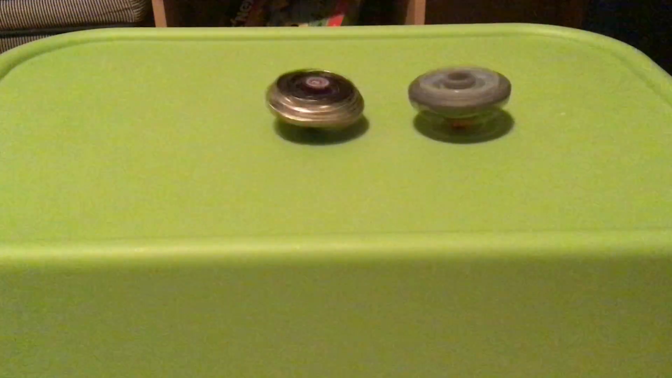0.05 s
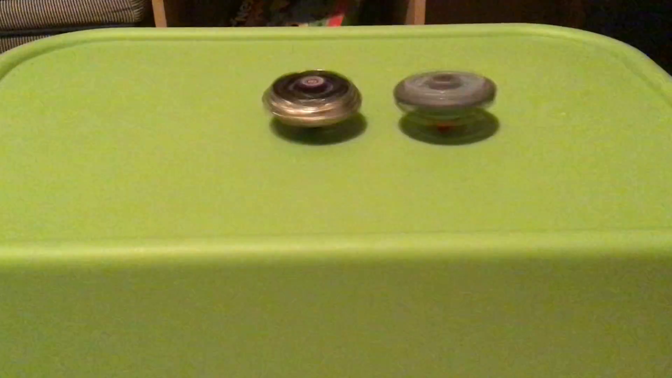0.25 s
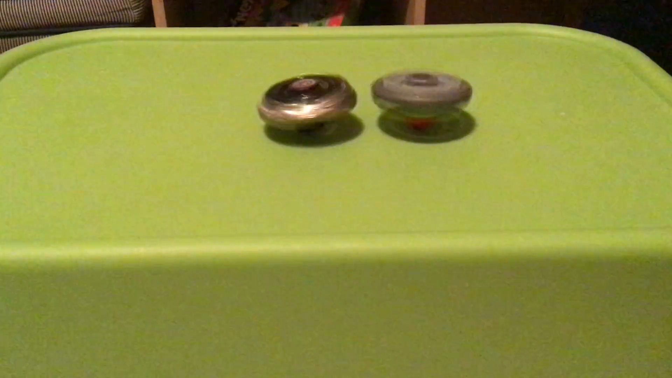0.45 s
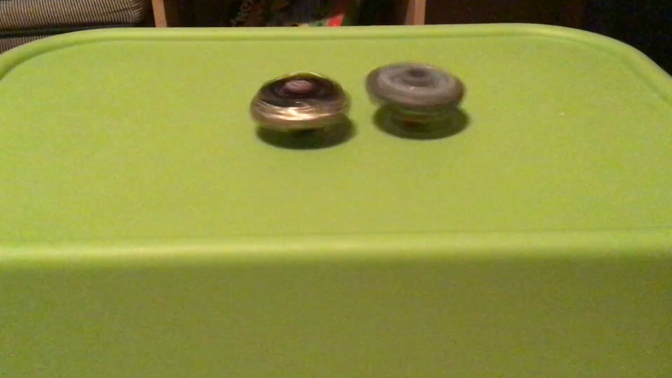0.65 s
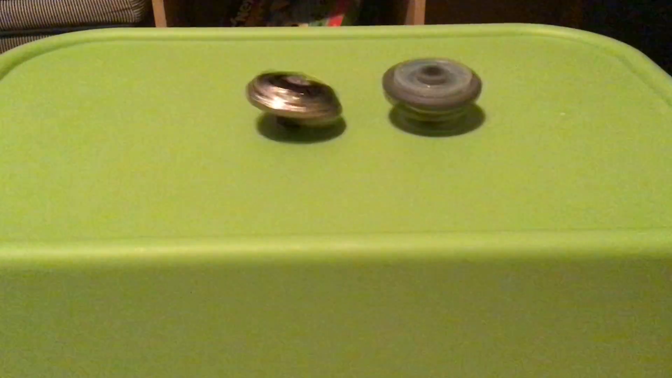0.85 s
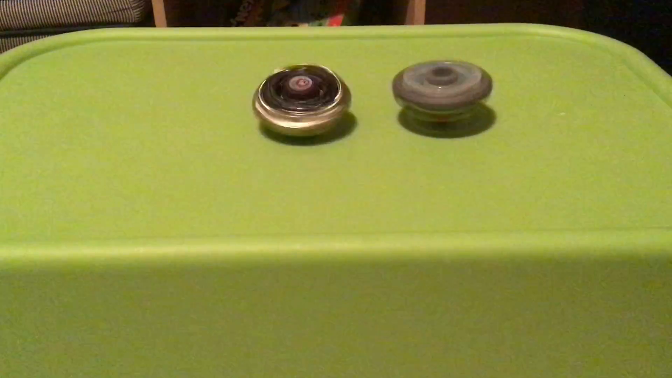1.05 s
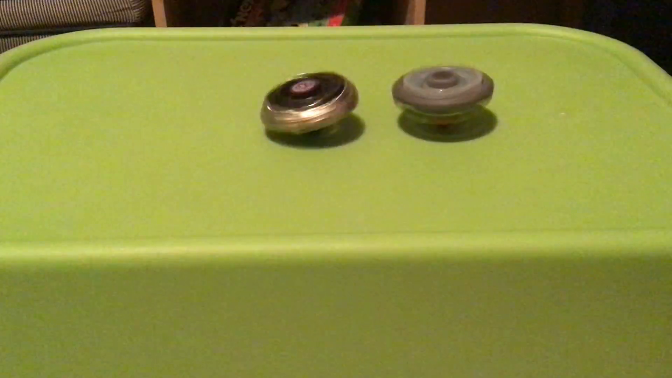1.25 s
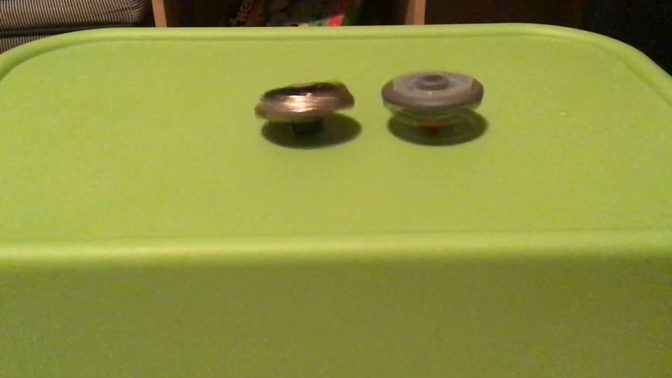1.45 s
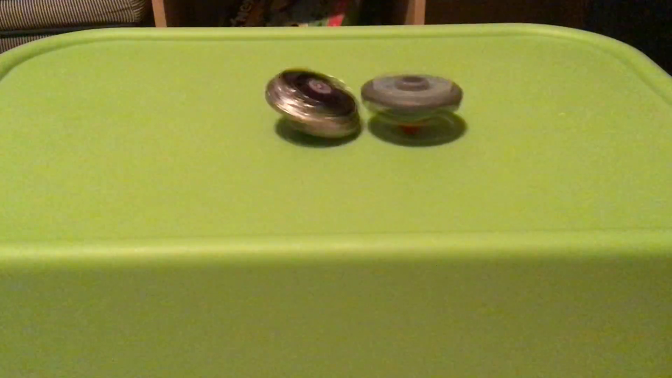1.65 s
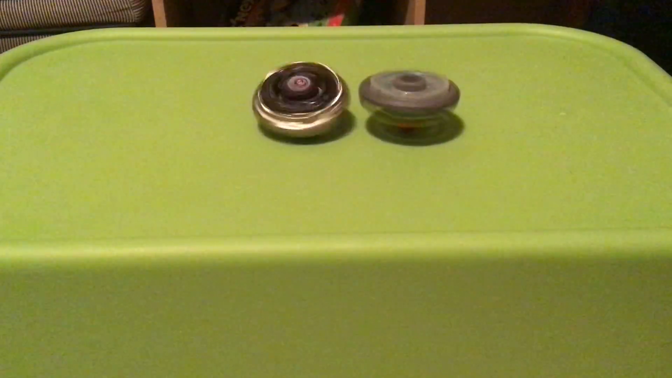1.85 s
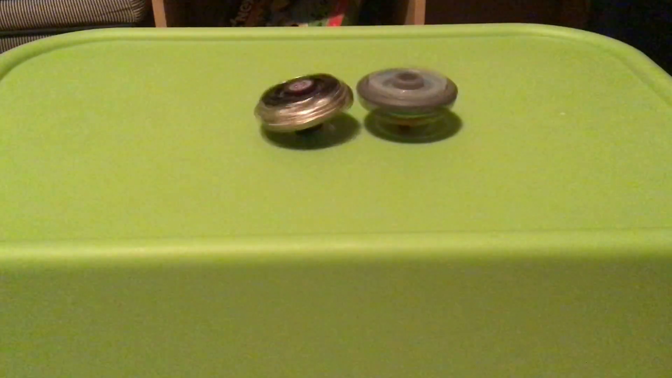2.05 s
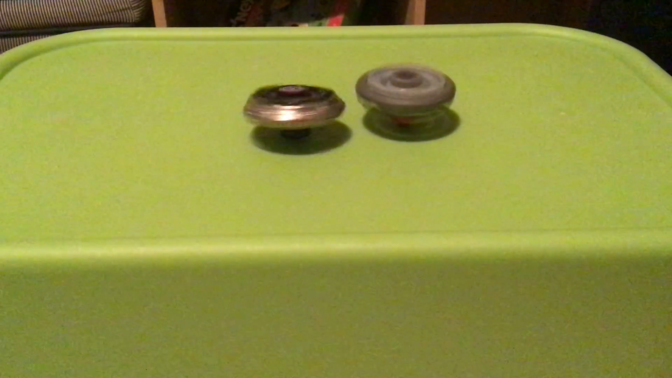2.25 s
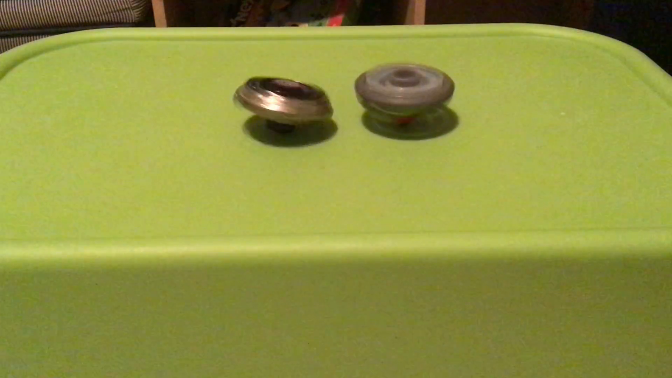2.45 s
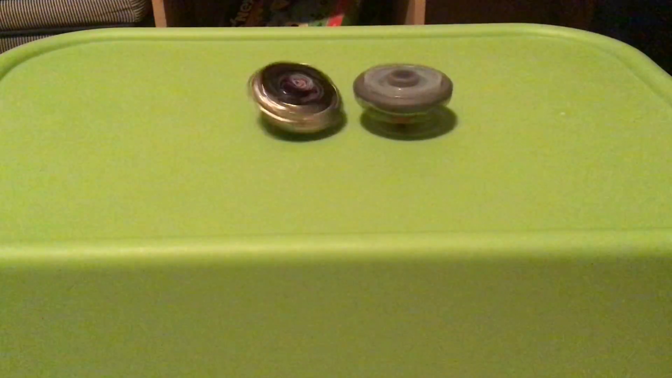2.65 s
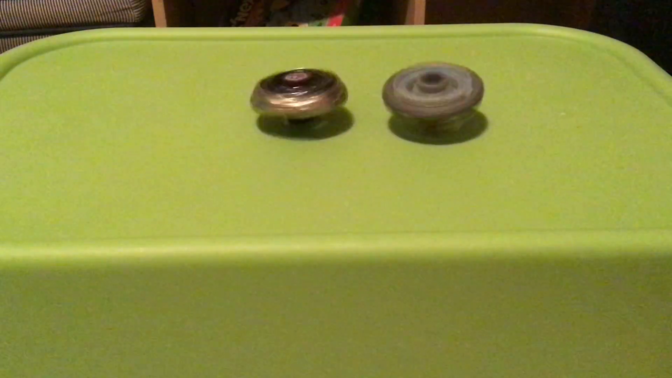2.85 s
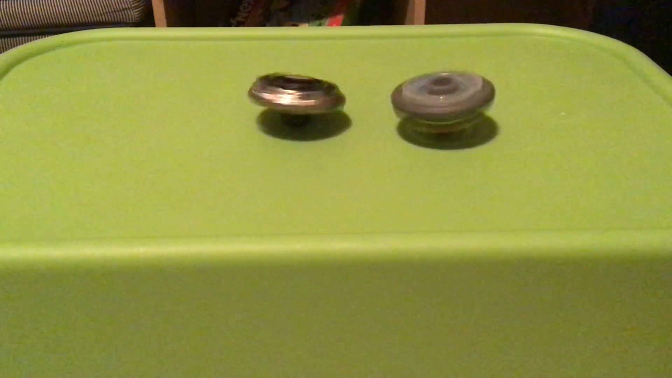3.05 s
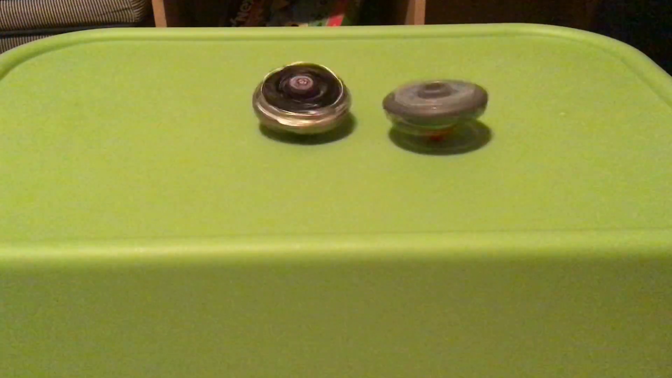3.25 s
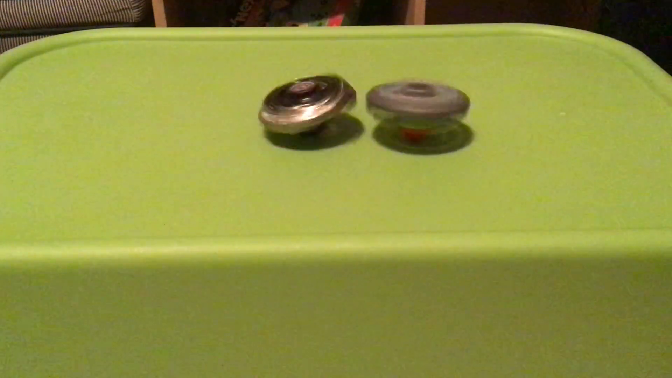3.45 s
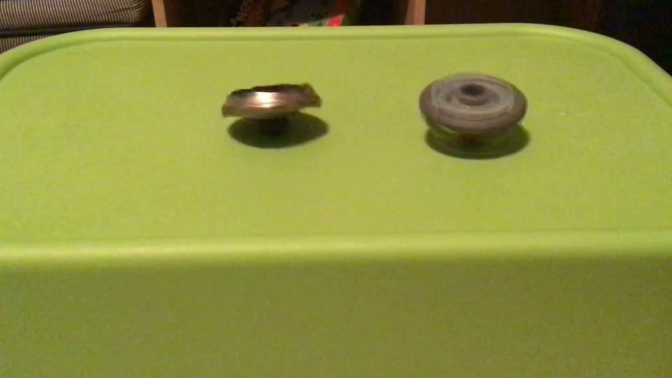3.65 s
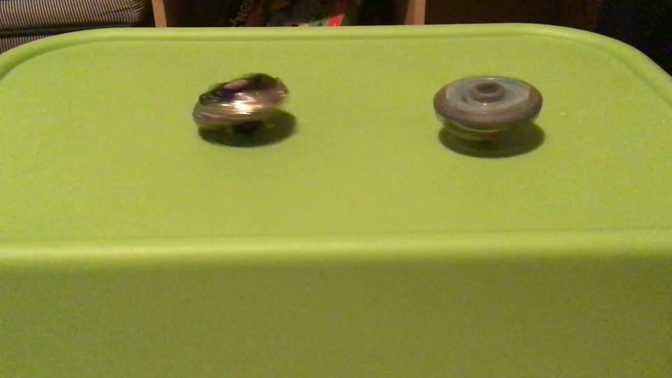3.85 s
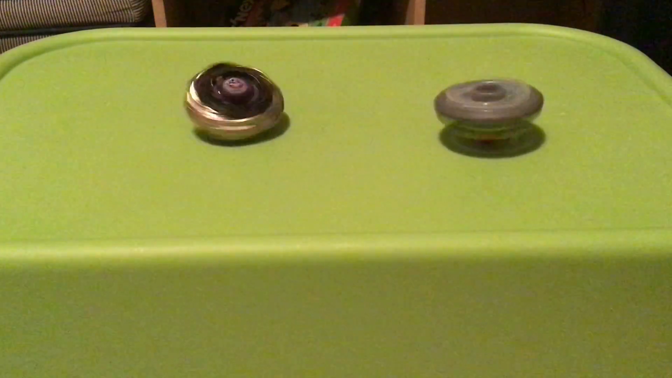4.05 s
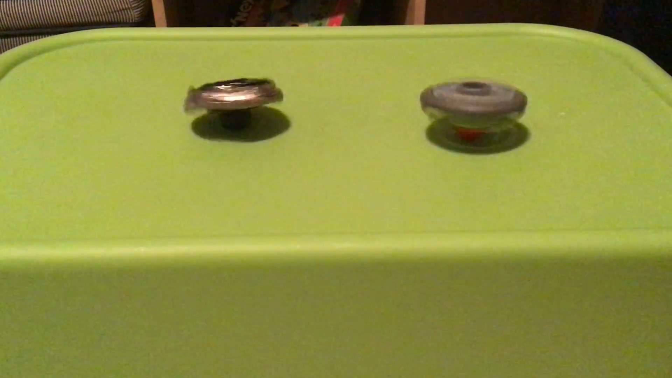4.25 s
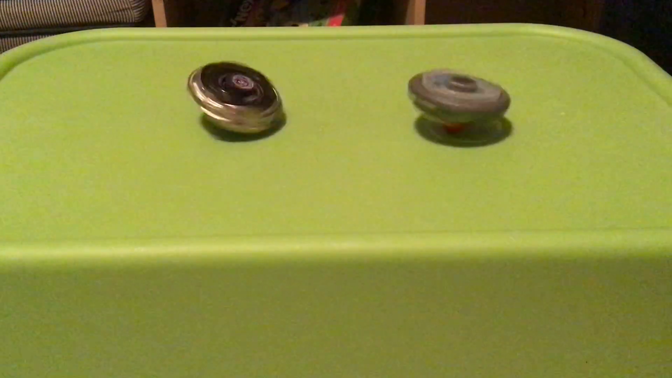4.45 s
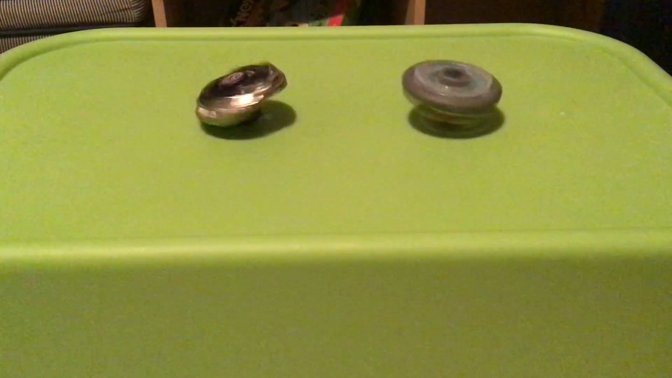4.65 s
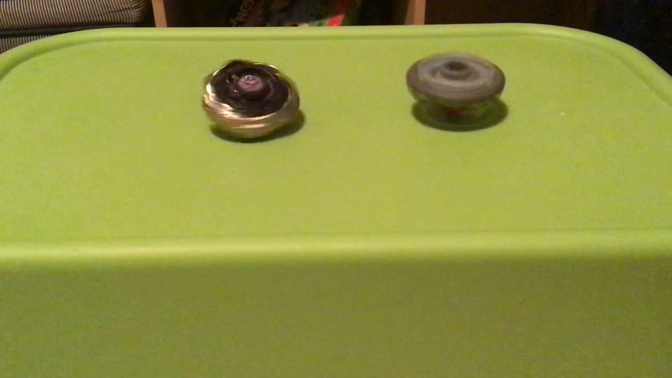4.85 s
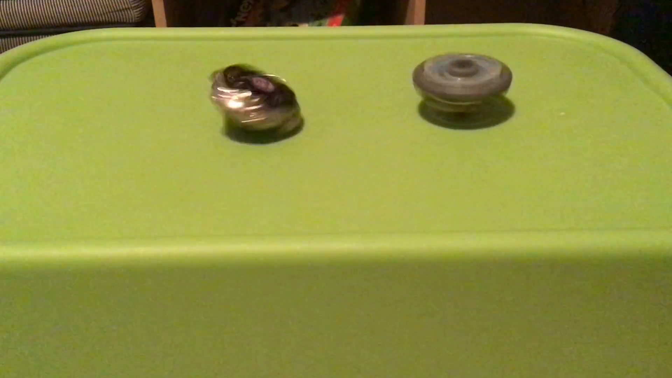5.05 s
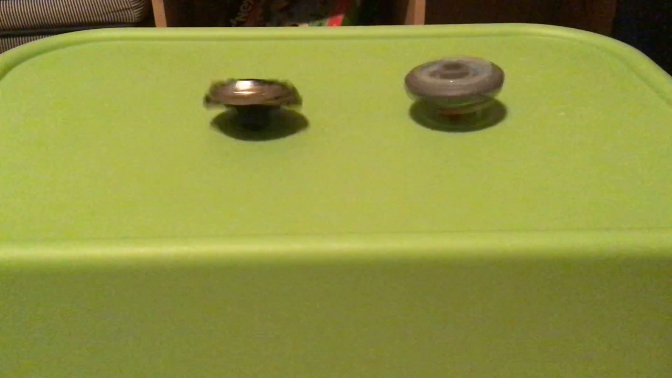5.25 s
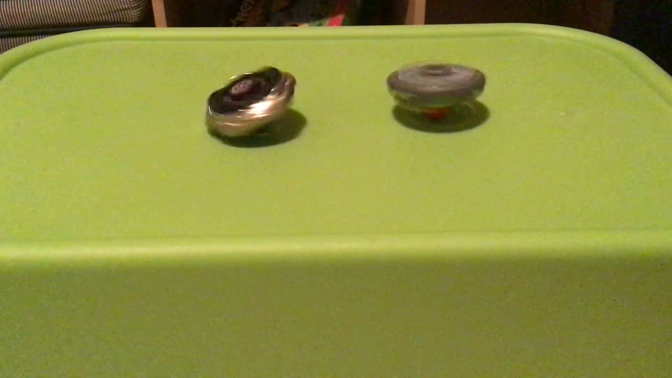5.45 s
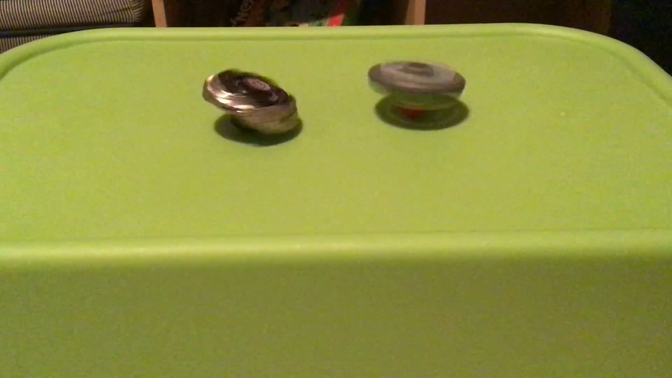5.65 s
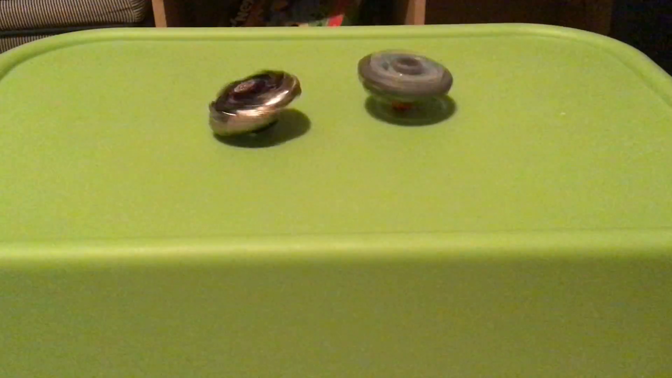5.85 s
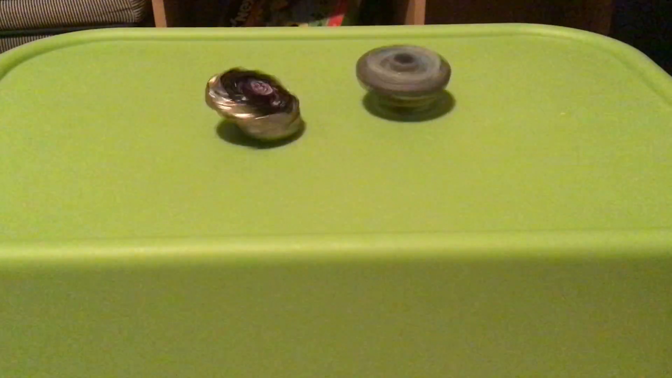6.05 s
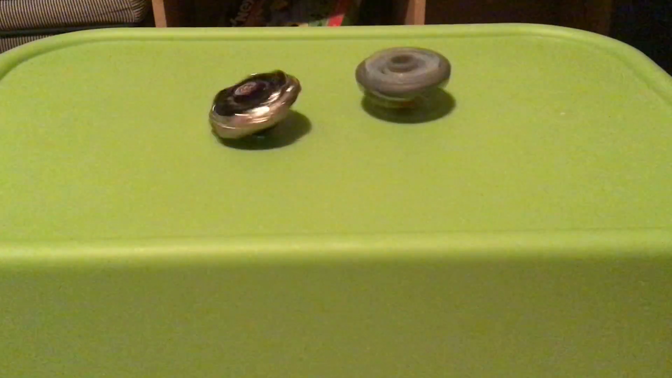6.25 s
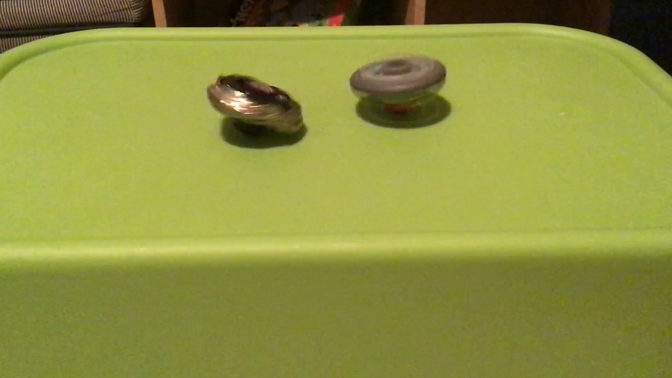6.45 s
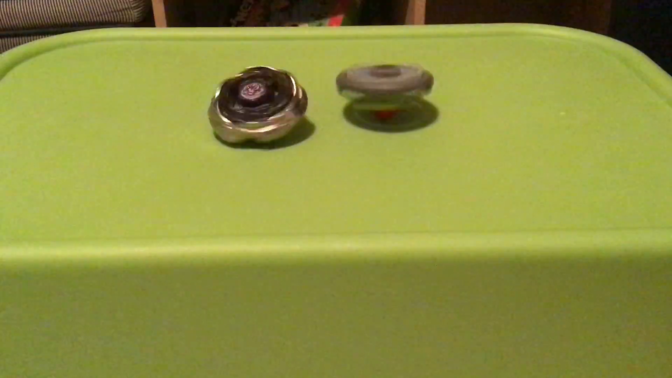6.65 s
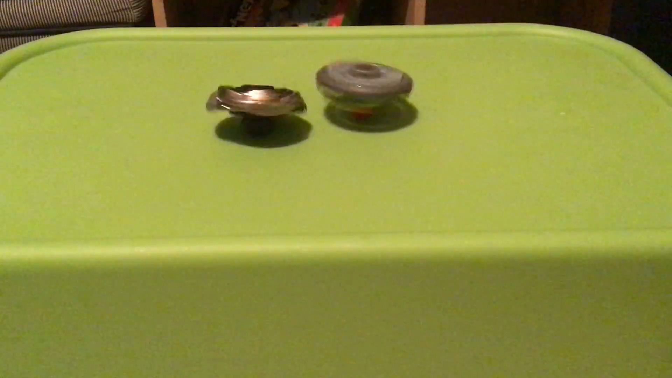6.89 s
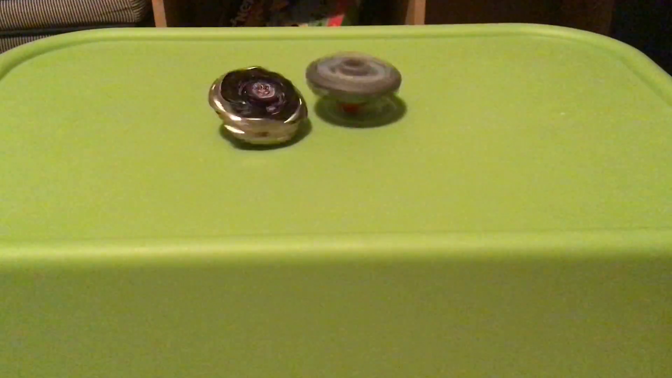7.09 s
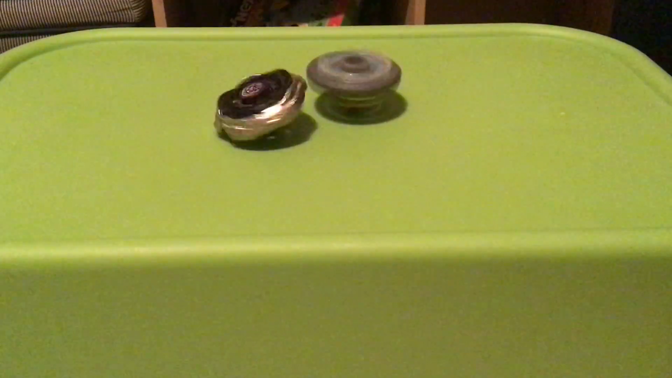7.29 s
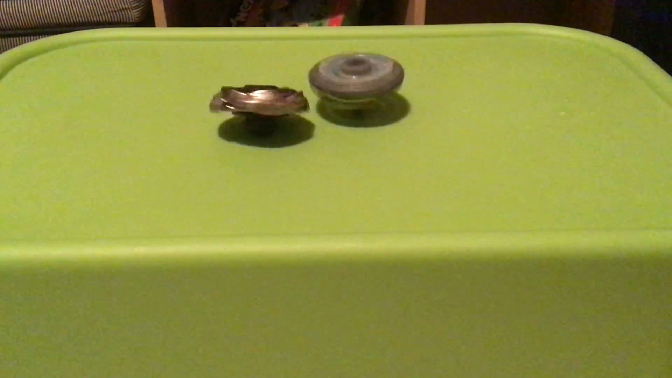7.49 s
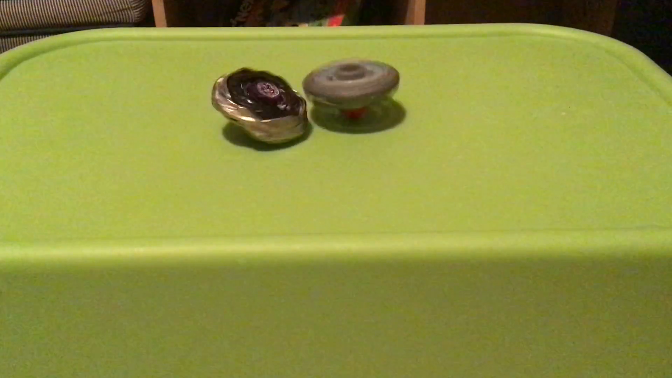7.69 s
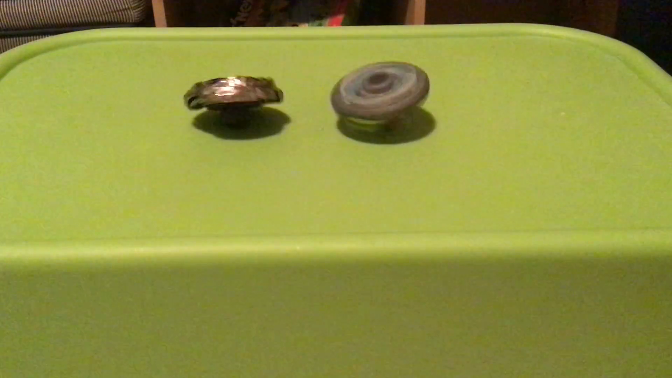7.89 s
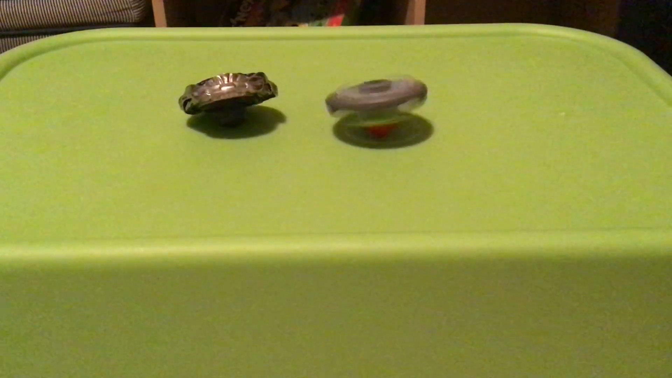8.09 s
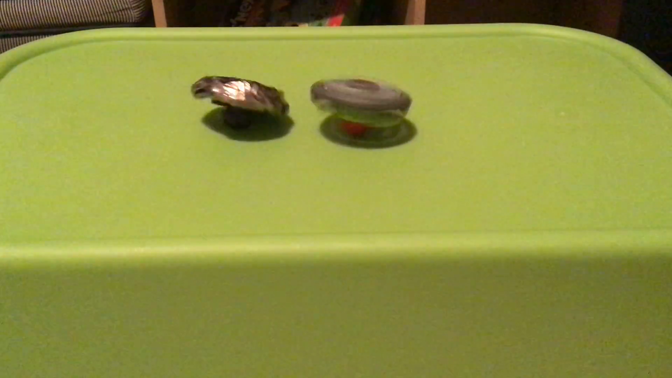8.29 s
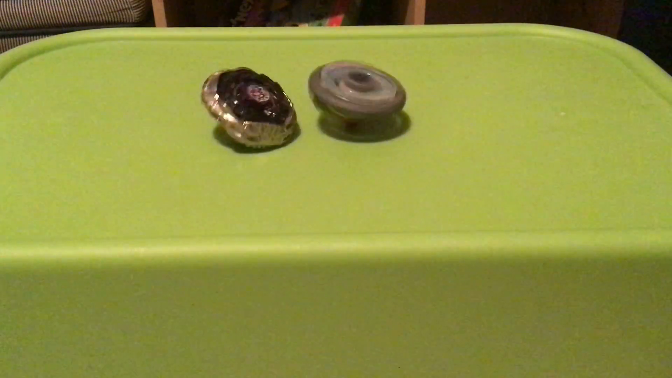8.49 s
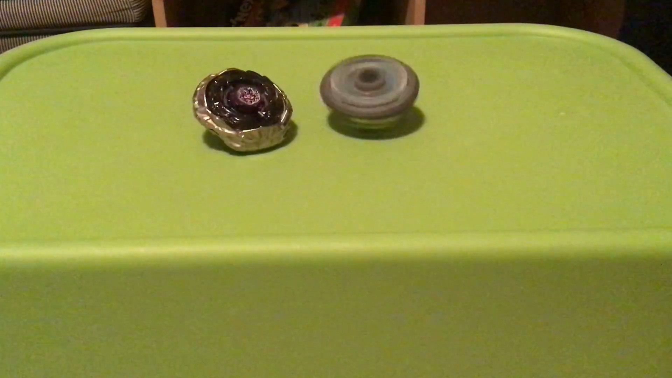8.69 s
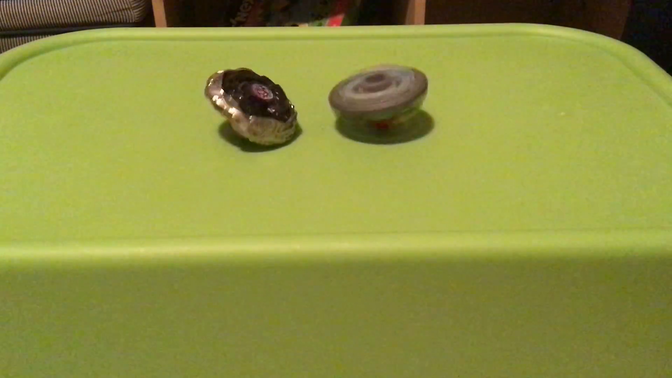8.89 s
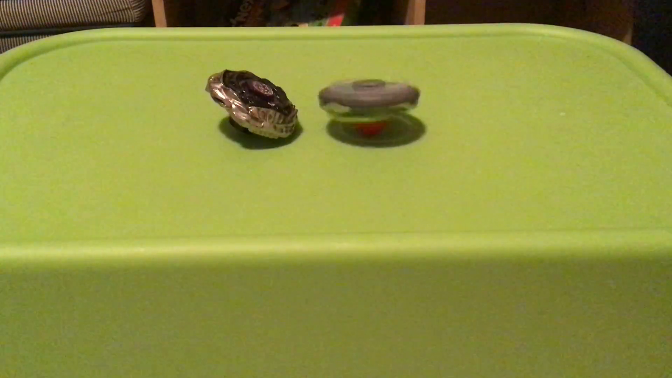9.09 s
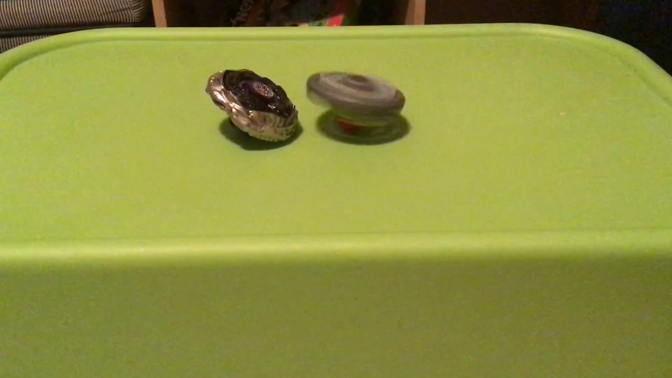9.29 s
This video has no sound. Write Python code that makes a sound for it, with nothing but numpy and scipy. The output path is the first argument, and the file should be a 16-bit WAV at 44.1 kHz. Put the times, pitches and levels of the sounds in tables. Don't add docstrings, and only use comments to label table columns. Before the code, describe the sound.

Low, uneven rumble of tops spinning on an upturned plastic tub, broken by bright rim clashes, thumping jolts, plastic snaps and a short scrape.

```python
import sys
import numpy as np
from scipy import signal
from scipy.fft import rfft, irfft, next_fast_len
from scipy.io import wavfile
from scipy.ndimage import uniform_filter1d

SR = 44100
rng = np.random.default_rng(int(sys.argv[2]) if len(sys.argv) > 2 else 0)


def unload_audio(sound):
    columns = np.transpose(np.atleast_2d(sound))
    steps = np.round(np.clip(columns, -1, 1) * 32767)
    wavfile.write(sys.argv[1], SR, steps.astype(np.int16))


def makeup_ratio(level_db):
    decades = np.asarray(level_db, float) / 20
    return 10 ** decades


N = 411364


def unit(x):
    return x / np.sqrt(np.mean(x ** 2) + 1e-20)


def peak(x):
    return x / np.abs(x).max()


def along(points, hz):
    f, v = np.transpose(points)
    return np.interp(np.log(hz + 1), np.log(f + 1), v)


def curves(rows):
    s, *columns = np.transpose(rows)
    return [np.interp(np.arange(N) / SR, s, column, -120, -120) for column in columns]


def filtered(x, response):
    m = next_fast_len(len(x))
    spectrum = rfft(x, m) * response(np.fft.rfftfreq(m, 1 / SR))
    return irfft(spectrum, m)[:len(x)]


def body(x, modes, order=1, sign=-1):
    def response(f):
        total = 0
        for k, (hz, width, db) in enumerate(modes):
            damping = 1j * f * width
            resonance = damping / (hz * hz - f * f + damping)
            total = total + sign ** k * makeup_ratio(db) * resonance ** order
        return total
    return filtered(x, response)


def add(track, s, sound):
    part = track[..., round(s * SR):][..., :sound.shape[-1]]
    part += sound[..., :part.shape[-1]]


def taps(per_s, spread_db):
    hits = rng.random(N) < per_s / SR
    signs = rng.choice([-1, 1], N)
    return hits * signs * makeup_ratio(spread_db * np.minimum(rng.exponential(1, N), 3))


def blows(t, contact):
    shape = (1 - np.exp(-t / .0004)) * np.exp(-t / max(contact, .0008))
    shape = shape + makeup_ratio(-12) * np.roll(shape, round(.003 * SR))
    grind = shape * rng.standard_normal((3, len(t)))
    return grind, (t == 0) * np.linalg.norm(shape)


def struck(t, contact, parts):
    grind, impulse = blows(t, contact)
    total = 0
    for burst, (modes, db) in zip(grind, parts):
        detune = [1 + .012 * rng.standard_normal(), 1, 1]
        reweight_db = np.outer(rng.normal(0, 1.5, len(modes)), [0, 0, 1])
        modes = np.array(modes) * detune + reweight_db
        direct = body(burst, modes, order=2)
        all_round = body(impulse, modes, order=2, sign=0.62)
        total = total + makeup_ratio(db) * np.array([direct, all_round]) / np.abs(direct).max()
    return total * (t < t[-1] / 2)


# (frequency [Hz], density [dB per Hz])
HISS = [(530, -38.5), (900, -10.5), (1000, -10), (1300, -19), (2720, -12.5), (6870, -18), (8980, -16),
        (12500, -22.5), (14800, -22), (15900, -38.5), (16500, -42.5)]


def microphone_hiss():
    return makeup_ratio(-78.5) * unit(filtered(rng.standard_normal(N), lambda hz: makeup_ratio(along(HISS, hz))))


# (frequency [Hz], t60 [s])
ROOM = [(300, .28), (1500, .29), (4000, .28), (9000, .28), (13000, .25), (16000, .22)]


def room(x):
    out, step = np.zeros(N), SR // 3
    for start in range(0, N, step):
        hz, t, z = signal.stft(rng.standard_normal(SR // 2), SR, nperseg=256)
        decay = makeup_ratio(-60 * t / along(ROOM, hz)[:, None])
        tail = signal.istft(z * decay, SR, nperseg=256)[1]
        tail = tail / np.linalg.norm(tail)
        add(out, start / SR + .003, signal.fftconvolve(x[start:start + step], tail))
    return out


# (time [s], speed [turns per s])
SPIN = [
    (0, 15.6),
    (9.33, 7.6),
]


def rattle():
    turns = np.cumsum(curves(SPIN)[0]) / SR
    ticks = np.diff(np.floor(turns - .04), prepend=-1) * makeup_ratio(rng.uniform(-8, 0, N))
    burst = signal.fftconvolve(ticks, np.hanning(SR // 500))[:N] * rng.standard_normal(N)
    modes = [(3600, 500, -5), (9000, 1500, -4), (11300, 1200, 0), (14500, 1000, -6)]  # Hz, width Hz, dB
    return makeup_ratio(-91) * unit(body(burst, modes, order=2))


# (time [s], pressure [dB])
MURMUR = [
    (0, -64),
    (1.7, -66),
    (2, -73),
    (4.4, -78.5),
    (5.3, -82),
    (5.6, -67.5),
    (6.4, -68),
    (7.15, -67),
    (7.3, -75),
    (9.33, -71),
]
# (frequency [Hz], width [Hz], level [dB])
MURMUR_MODES = [(470, 40, -3), (583.7, 26, 1.5), (732.7, 36, -8), (968, 45, -12)]


def murmur():
    return makeup_ratio(curves(MURMUR)[0]) * unit(body(taps(per_s=300, spread_db=3.5), MURMUR_MODES, order=2))


# (time [s], peak [dB], second mode [dB], snap [dB], main mode [Hz])
CLICKS = [(4.9546, -58.5, -8, -3, 2150), (5.0568, -36, -7.5, -26, 2050), (5.0654, -45, -10.5, -26, 2150),
          (5.287, -31, 0, -11.5, 2040), (5.3497, -46.5, -4, -13, 2090), (5.629, -36, -2.5, -5, 2083),
          (5.6413, -38, 2, -1, 1967), (6.4276, -29.5, -12.5, -3, 2030), (6.555, -34.5, -7, -18, 1955),
          (7.3825, -28.5, -7, -9, 1930), (7.6625, -17.5, -9, -14.5, 1960), (7.6705, -47, -6, 6, 2100),
          (7.7045, -23.5, -6.5, -11, 2030), (8.226, -48, 0, 0.5, 1750), (8.3385, -49, -11, -15, 2150),
          (8.3554, -54, -6, -6, 2300), (8.3977, -39, -2, -10, 2090), (8.471, -41, -7, -12, 2200),
          (8.5094, -38, -8, -14, 2300), (8.5147, -33, -14, -14, 2150), (8.5482, -29, -10, -14, 2050),
          (8.5538, -31.5, -7, -6, 2280), (8.572, -31, -5, -15, 2380), (8.592, -37, -5, -12, 2200),
          (8.612, -37, -5, -7, 2250), (8.6036, -24.5, -2, -8.5, 1780)]
# (share of the main mode [ratio], level [dB])
SHELL = [(0.8, -14), (1, -1), (1.22, -18)]
# (frequency [Hz], width [Hz], level [dB])
SHELL_SECOND = [(3100, 680, 3), (4180, 700, -9), (2660, 400, -7.5)]
# (frequency [Hz], width [Hz], level [dB])
SNAP = [(4670, 1400, 5.5), (6545, 810, 7.5), (8540, 1200, 7.5), (10800, 1900, -5.5), (14300, 3870, -13.5)]
# (time [s], force [dB])
DRAG = [
    (8.32, -69.5),
    (8.4, -48.5),
    (8.46, -52.5),
    (8.51, -40.5),
    (8.558, -37.5),
    (8.59, -40),
    (8.606, -39),
    (8.63, -54),
    (8.76, -88),
]


def plastic():
    out, t = np.zeros((2, N)), np.arange(SR // 8) / SR
    for s, db, second_db, snap_db, hz in CLICKS:
        shell = [(share * hz, 310, level) for share, level in SHELL]
        parts = [(shell, 0), (SHELL_SECOND, second_db + 0.5), (SNAP, snap_db + 4)]
        add(out, s, makeup_ratio(db) * struck(t, 0.00076, parts))
    skids = signal.fftconvolve(np.abs(taps(per_s=600, spread_db=4)), np.hanning(SR // 400))[:N]
    grit = skids * rng.standard_normal(N)
    hollow_modes = [(1535, 490, -4), (2150, 550, -4), (2560, 470, -9.5), (3360, 760, -7)]  # Hz, width Hz, dB
    hollow = unit(body(grit, hollow_modes, order=2))
    bright = unit(body(grit, SNAP, order=2))
    return out + makeup_ratio(curves(DRAG)[0] - 4.5) * (hollow + makeup_ratio(-16) * bright)


# (time [s], pressure [dB])
CHATTER = [(0.0, -45.5), (0.47, -47), (0.83, -49.5), (1.25, -53.5), (1.71, -48), (1.9, -58.5),
           (2.57, -58.5), (3.71, -48.5), (4.36, -55.5), (4.65, -44), (5.01, -56), (5.82, -51),
           (6.21, -57.5), (6.94, -53.5), (7.43, -58), (7.85, -56.5), (7.97, -50.5), (9.33, -54)]
# (frequency [Hz], width [Hz], level [dB])
BOOM = [(82, 45, -0.5), (98.04, 20, -1.5)]
# (frequency [Hz], width [Hz], level [dB])
LID = [(129.3, 55, -4), (194, 100, -14), (221.2, 32, -9.5), (256.15, 33, -2), (304.9, 45, -8.5),
       (365, 100, -23.5)]
# (frequency [Hz], width [Hz], level [dB])
LID_UPPER = [(471, 72, -1.5), (562.4, 60, 1.5), (616, 88, -4), (714, 150, -4.5), (1003, 210, -13),
             (1207, 37, -14.5)]
# (frequency [Hz], width [Hz], level [dB])
SCUFF = [(1270, 1800, 5), (2790, 200, -2)]


def chatter():
    drum_db, t = curves(CHATTER)[0], np.arange(N) / SR
    usual_db = drum_db.mean()
    scratch_db = usual_db + 0.65 * (drum_db - usual_db) - 13 - 0.24 * t
    shaken, settle_s = np.zeros(N), .07
    for s, db, *_ in THUMPS:
        add(shaken, s, makeup_ratio(db) * np.exp(-t[:SR // 2] / settle_s))
    tips = taps(per_s=230, spread_db=4)
    low = unit(unit(body(tips, LID, order=2)) + makeup_ratio(-9) * unit(body(tips, BOOM, order=2)))
    skid_t, skid_s = t[:SR // 20], 0.0063
    skid = skid_t ** .5 * np.exp(-skid_t / skid_s)
    skids = signal.fftconvolve(np.abs(tips) ** 1.7, skid)[:N] * rng.standard_normal(N)
    upper = unit(body(skids, LID_UPPER, order=2)) + makeup_ratio(-10) * unit(body(skids, SCUFF, order=2))
    drumming = (makeup_ratio(drum_db + 3) + makeup_ratio(-26) * shaken) * low
    scratching = (makeup_ratio(scratch_db) + makeup_ratio(-41.5) * shaken) * upper
    return drumming + scratching


# (time [s], peak [dB], upper modes [dB], boom [dB], shove length [s])
THUMPS = [(0.177, -31, -8.5, -9, 0.015), (0.69, -15, -12.5, -20.5, 0.013), (0.719, -19, -14, -9, 0.005),
          (1.74, -29.5, -8, -12.5, 0.02), (1.768, -20, -5.5, -10, 0.025), (2.786, -14.5, -9, -9.5, 0.008),
          (3.578, -12.5, -10.5, -17, 0.0062), (3.595, -27, -4, -13.5, 0.034),
          (3.652, -22, -5.5, -19, 0.012), (3.957, -18.5, -14.5, -13, 0.013),
          (5.161, -26.5, -12, -30.5, 0.01), (7.799, -20.5, -10, -17, 0.0041),
          (7.811, -11, -8.5, -9.5, 0.014), (7.842, -12, -16, -23, 0.0046), (8.033, -30, -2, -31.5, 0.012),
          (8.412, -32.5, -1.5, -9.5, 0.011), (8.427, -27, -15, -18, 0.0036),
          (8.525, -20, -9.5, -22.5, 0.007), (8.547, -29.5, -13, -10.5, 0.013),
          (8.967, -30.5, -5.5, -16.5, 0.015)]
# (time [s], peak [dB], upper modes [dB])
NUDGES = [(0.278, -42, -23), (0.883, -34, -15), (0.94, -37, -11), (1.237, -36.5, -13), (1.433, -43.5, -14),
          (1.517, -43, -27), (2.047, -34, -15.5), (2.202, -35.5, -12.5), (2.408, -37, -8.5),
          (2.569, -34.5, -12.5), (2.741, -34, -19), (3.093, -45.5, -20), (3.18, -40.5, -28),
          (3.27, -33.5, -15.5), (3.418, -46, -14), (3.492, -36, -11), (3.806, -35.5, -13),
          (4.083, -43, -14), (4.423, -33, -29), (4.696, -41.5, -28), (5.373, -47, -27), (5.554, -40, -28),
          (5.727, -41.5, -23), (6.309, -45.5, -8.5), (6.725, -40, -15.5), (6.962, -36.5, -15.5),
          (8.138, -43.5, 0), (8.251, -45.5, -7), (8.759, -43.5, -20.5), (9.259, -45.5, -25)]


def thumps():
    out, t = np.zeros(N), np.arange(SR // 5) / SR
    bend_s = 0.00691
    swing_s, sag_hz_per_s = .011, 300
    nudge_boom_db, nudge_s = -11, .022
    nudges = [(*row, nudge_boom_db, nudge_s) for row in NUDGES]
    for s, db, upper_db, boom_db, length in THUMPS + nudges:
        u = t / max(length, .003)
        shove = u ** 0.62 * np.exp(-1.3 * u) * rng.standard_normal(len(t))
        early = u ** .2 * np.exp(-1.5 * u) * rng.standard_normal(len(t))
        spot_hz = 262 + 9 * rng.standard_normal()
        lag = np.maximum(t - bend_s, 0)
        swell = peak(lag * np.exp(-lag / min(length, swing_s)))
        swing = swell * np.sin(2 * np.pi * (spot_hz - sag_hz_per_s * lag) * lag)
        swing_db = -3.5 + .25 * (db + 14)
        lid = peak(body(shove, [*LID, (spot_hz, 55, 5)], order=2))
        boom = peak(body(shove, BOOM, order=2))
        low = makeup_ratio(swing_db) * swing + makeup_ratio(-3.5) * lid + makeup_ratio(boom_db) * boom
        upper = peak(body(early, LID_UPPER, order=2)) + makeup_ratio(-8.5) * peak(body(early, SCUFF, order=2))
        add(out, s - .004, makeup_ratio(db) * (low + makeup_ratio(upper_db) * upper))
    return out


# (frequency [Hz], width [Hz], level [dB])
RIM = [(3540, 900, -6), (4364, 2300, -14), (5300, 4200, -0.5), (6130, 2700, -0.5), (7180, 1100, -8),
       (9130, 760, -4.5)]
# (frequency [Hz], width [Hz], level [dB])
RIM_TREBLE = [(9194, 640, -4), (10920, 2400, 8), (13100, 5300, 2.5), (15550, 2500, 0)]
# (frequency [Hz], width [Hz], level [dB])
CORE = [(970, 260, 2.5), (2300, 2400, 2.5)]


def crack(t, treble_db, body_db, contact):
    return struck(t, contact, [(RIM, 0), (RIM_TREBLE, treble_db), (CORE, body_db)])


def ringing(t, hz, t60):
    flutter = 1 + 1.3 * uniform_filter1d(rng.standard_normal(len(t)), size=400) * 20
    return flutter * makeup_ratio(-60 * t / t60) * np.sin(2 * np.pi * hz * t)


# (frequency [Hz], level [dB], t60 [s])
RING = [(3500, -3, .14), (4850, -7, .09), (5290, -3, .12), (6000, -7, .09), (7153, 0, .2), (8800, -4, .12),
        (11300, -4, .1), (13100, -8, .07), (14200, -8, .07), (3120, -6, .1), (6700, -6, .12),
        (9500, -7, .11), (10780, -6, .12), (12720, -9, .1)]


def full_ring(t, lasting=1):
    return sum(makeup_ratio(db + rng.normal(0, 4)) * ringing(t, hz, lasting * t60) for hz, db, t60 in RING)


def favoured(t, hz):
    return ringing(t, hz, .13) + makeup_ratio(16) * ringing(t, hz, .022)


# (time [s], peak [dB], treble [dB], body [dB], ring [dB])
CLASHES = [(0.6604, -17.5, -7, -13, 2), (0.6892, -2, -9.5, -12.5, -16.5), (1.7617, -11.5, -5.5, -9.5, -5),
           (2.7797, -4, -7.5, -16.5, -14), (3.5724, -4.5, -7.5, -9.5, -13), (3.6638, -26, -14, -12, -23),
           (3.9574, -21.5, -19, -5.5, -11), (7.7959, -6, -9, -12.5, -10), (7.848, -19, -11, -5.5, -5.5),
           (8.4218, -24, -11.5, -32, -16), (8.534, -29, -8, 2, -8.5)]
# (time [s], peak [dB], ring [dB], mode [Hz])
PINGS = [(1.1177, -54.5, -14.5, 4800), (1.266, -45.5, -19, 4830), (4.1198, -44, -11, 5300),
         (4.3588, -50.5, -12, 4850), (4.3586, -56, -11.5, 5620), (4.134, -44, -28, 3430),
         (5.4743, -47.5, -21, 7410), (5.4743, -53, -20.5, 5200), (7.911, -34.5, -29, 5300),
         (7.948, -37.5, -25, 5340), (8.0411, -33.5, -24.5, 4930), (8.9778, -38, -28, 7270)]
# (time [s], level [dB], frequency [Hz])
FAVOURED = [(0.688, -46.5, 7140), (1.4, -82, 3940), (1.2, -73, 7900), (0.97, -79, 8900),
            (1.7616, -50, 11400), (1.762, -53, 16000), (1.762, -56, 4200), (1.739, -59, 13000),
            (4.1202, -74, 11500), (4.1202, -69, 3500), (1.7618, -51, 6010), (1.7626, -42, 8800),
            (1.762, -54, 2300), (2.7806, -48, 3550), (2.7813, -41.5, 8700), (7.7963, -54.5, 6300),
            (8.039, -65, 7150)]
# (time [s], peak [dB], treble [dB], body [dB])
TOUCHES = [(0.1755, -63, -8, -13), (0.2606, -59, -3, 1), (0.5162, -56, -7.5, -5.5), (1.552, -60.5, -5, -2),
           (3.8015, -81, -14.5, 10.5), (4.513, -59.5, -6, 4.5), (4.6062, -62.5, -4, -6),
           (4.689, -64.5, -11, -1.5), (4.8551, -61, -8.5, -2.5), (5.16, -51.5, -15, -2),
           (5.5168, -54, -13, -3.5), (6.9, -60.5, -12, -6), (7.158, -60, -4.5, 5.5),
           (8.375, -54, -5.5, -15.5), (0.896, -63.5, -1, -15), (7.774, -60, 0, -15),
           (5.213, -65, -2.5, -15), (5.615, -61, -6, -15), (8.4175, -32, -21, -15), (8.526, -39, -13, -8),
           (8.1386, -54, -18.5, 6.5), (8.3926, -35, -20, -17), (8.744, -54, -16, -15),
           (9.2486, -56, -7, -1.5),
           (1.731, -39.5, -12, -11), (1.736, -42, -6.5, -10), (1.75, -40, -15, -8),
            (1.7405, -35.5, -16, -10.5), (2.7588, -50.5, -5.5, -13), (3.552, -53.5, -3.5, -9),
            (3.656, -47, -20, 11.5), (3.928, -65, -6, -14.5), (2.552, -70.5, -23.5, 10),
            (3.414, -72.5, -21.5, 13), (3.463, -74, -18, 13.5), (2.408, -72.5, -26, 7),
            (3.967, -34.5, -5, 1), (5.173, -45.5, -13.5, 8.5), (8.0318, -44, -31.5, 0),
            (8.9661, -54, -20.5, 7)]
WET = np.array([[1], [.4]])


def clashes():
    out, t = np.zeros((2, N)), np.arange(SR // 5) / SR
    for s, db, treble_db, body_db, ring_db in CLASHES:
        ring = makeup_ratio(ring_db - 18) * WET * full_ring(t)
        add(out, s, makeup_ratio(db - 5) * (crack(t, treble_db + 10, body_db + 2, contact=.0018) + ring))
    for s, db, ring_db, hz in PINGS:
        ring = favoured(t, hz) + makeup_ratio(-19) * full_ring(t, lasting=.6)
        add(out, s, makeup_ratio(db) * (crack(t, -6, -7, contact=.0037) + makeup_ratio(ring_db - 2.5) * WET * ring))
    for s, db, hz in FAVOURED:
        add(out, s, makeup_ratio(db) * WET * favoured(t, hz))
    for s, db, treble_db, body_db in TOUCHES:
        add(out, s, makeup_ratio(db + 1.5) * crack(t[:SR // 20], treble_db + 8, body_db, contact=.00054))
    return out


def scene():
    lid = rattle() + murmur() + chatter() + thumps()
    part_direct, part_round = plastic()
    metal_direct, metal_round = clashes()
    reverberation = room(makeup_ratio(-2) * metal_round + makeup_ratio(-2.5) * part_round + makeup_ratio(-8.5) * lid)
    return (metal_direct + part_direct + lid + reverberation)[None]


# (frequency [Hz], level [dB])
TOP = [(15500, -2), (16000, -12.5), (16800, -42.5)]


def top_cut(x):
    return signal.sosfilt(signal.butter(12, 16850, fs=SR, output="sos"), x)


def record(dry):
    sound = filtered(dry[0], lambda hz: (1j * hz / (32 + 1j * hz)) ** 5)
    sound = sound / (1 + np.abs(sound / .62) ** 4) ** .25
    sound = filtered(sound, lambda hz: makeup_ratio(along(TOP, hz))) + microphone_hiss()
    return top_cut(sound[None])


dry = scene()
out = record(dry)
unload_audio(out)
```